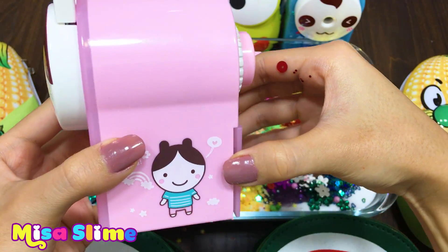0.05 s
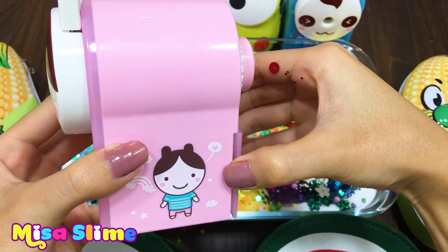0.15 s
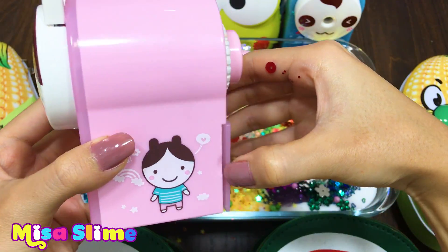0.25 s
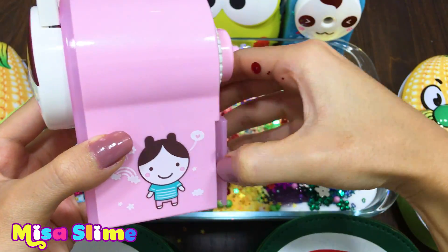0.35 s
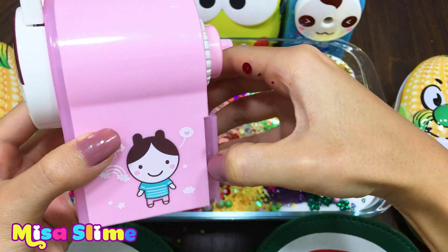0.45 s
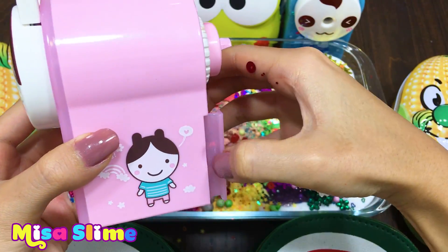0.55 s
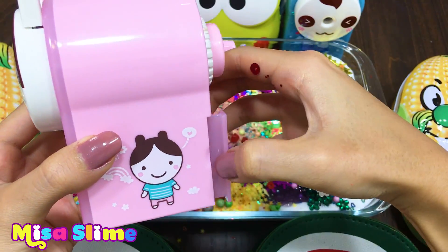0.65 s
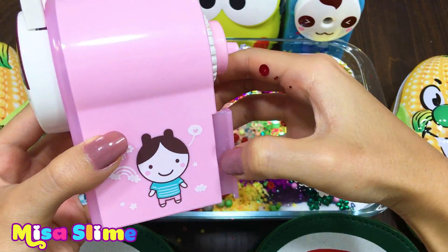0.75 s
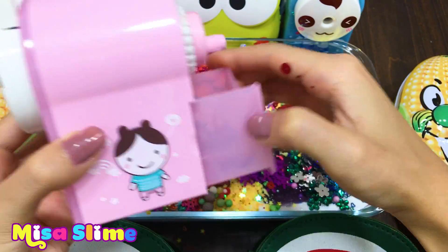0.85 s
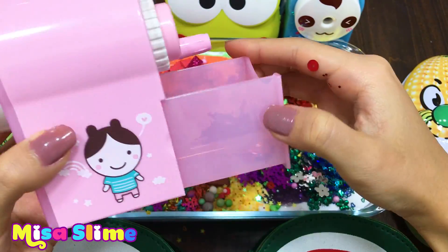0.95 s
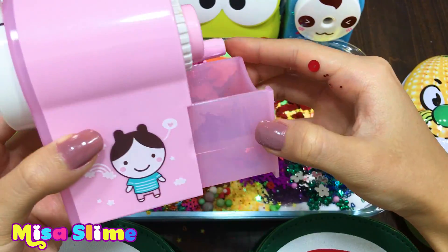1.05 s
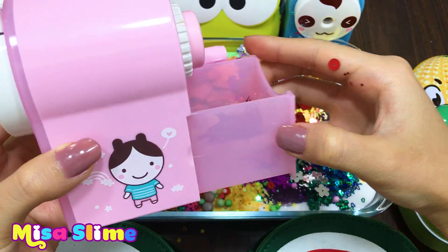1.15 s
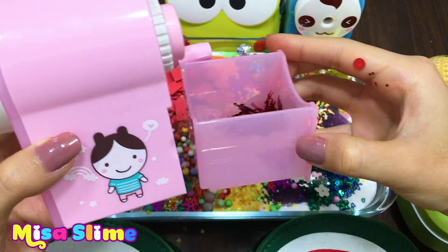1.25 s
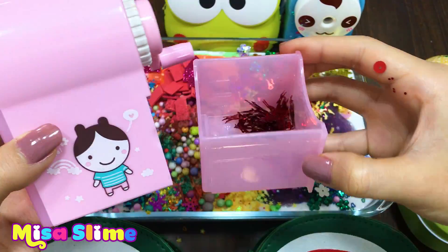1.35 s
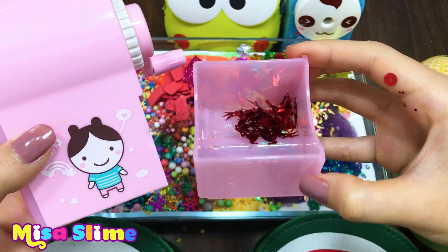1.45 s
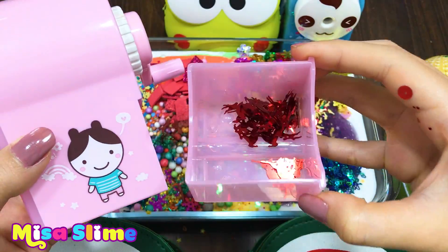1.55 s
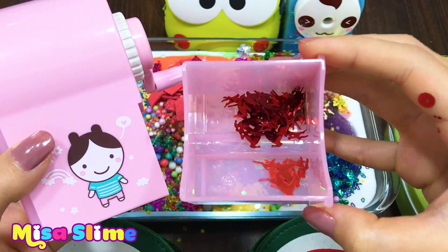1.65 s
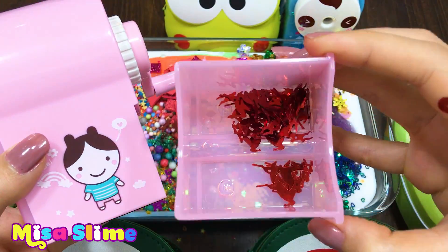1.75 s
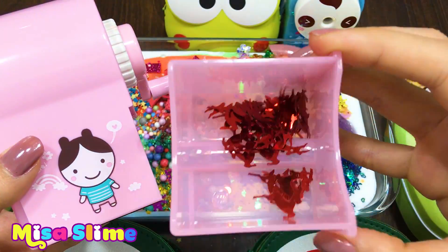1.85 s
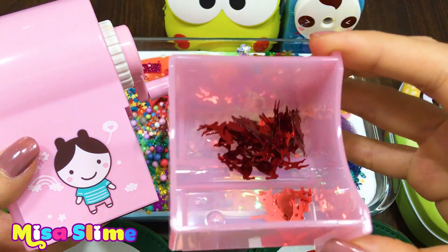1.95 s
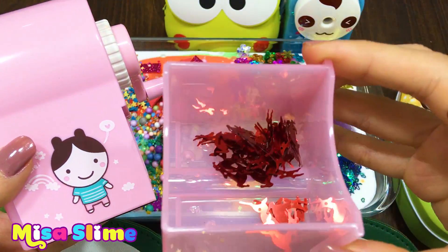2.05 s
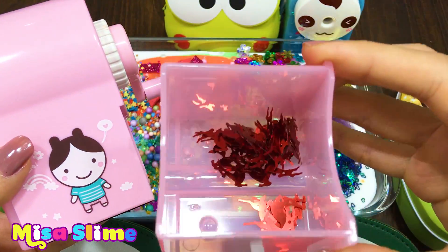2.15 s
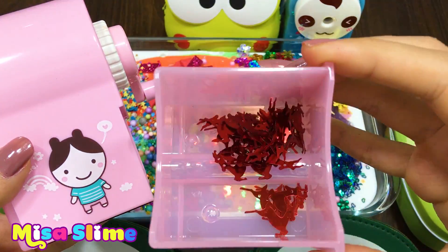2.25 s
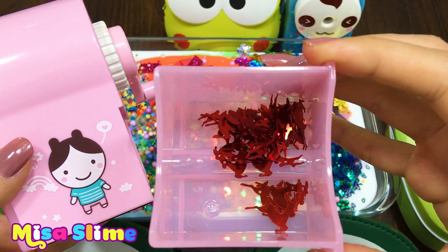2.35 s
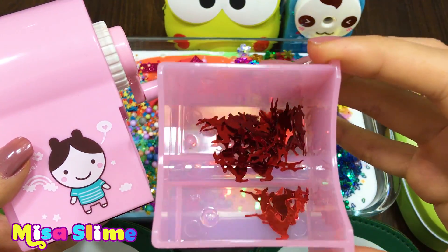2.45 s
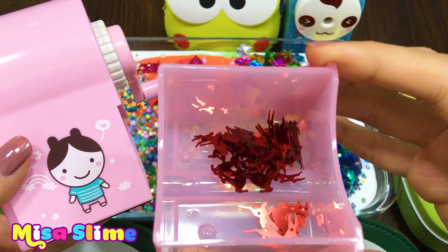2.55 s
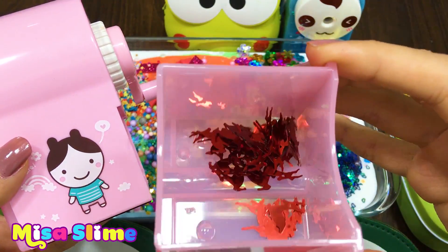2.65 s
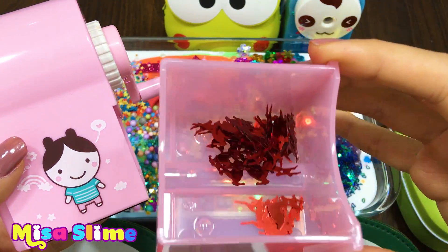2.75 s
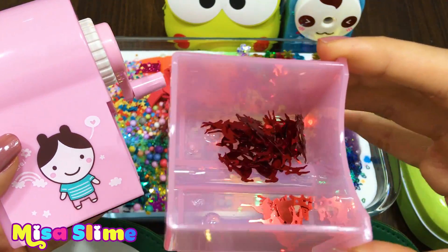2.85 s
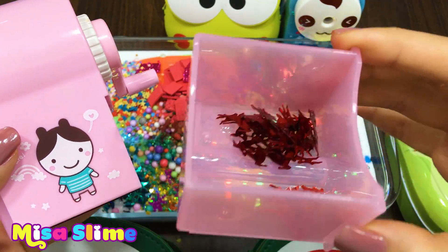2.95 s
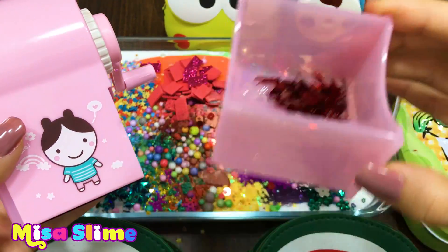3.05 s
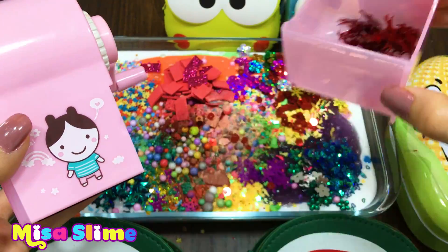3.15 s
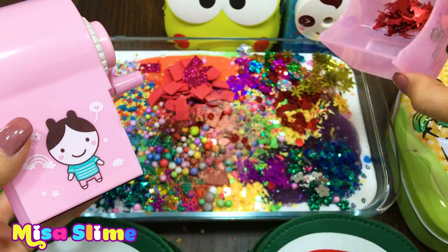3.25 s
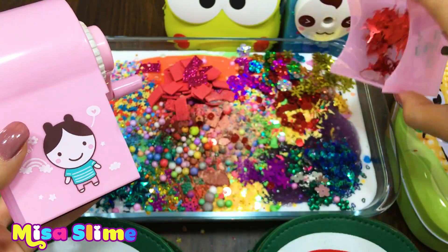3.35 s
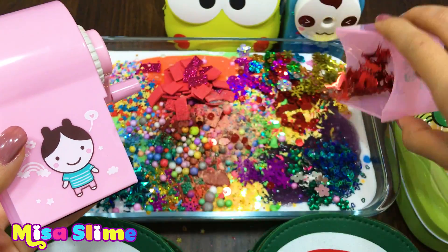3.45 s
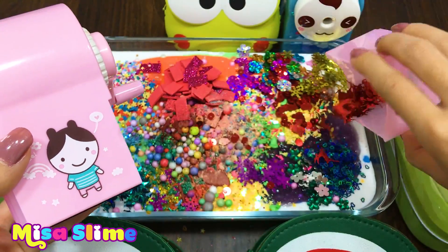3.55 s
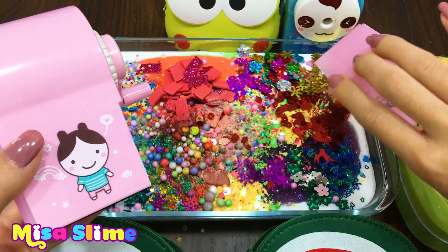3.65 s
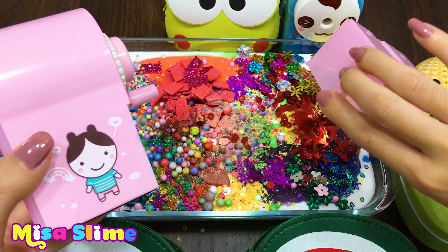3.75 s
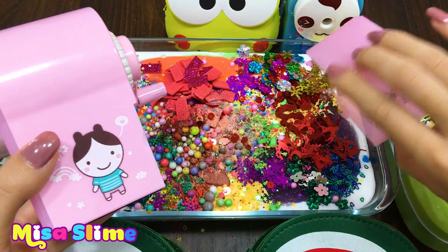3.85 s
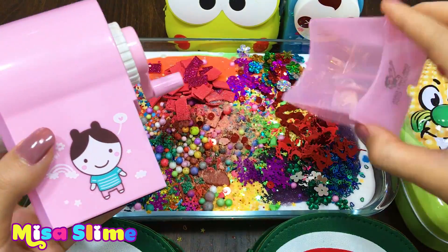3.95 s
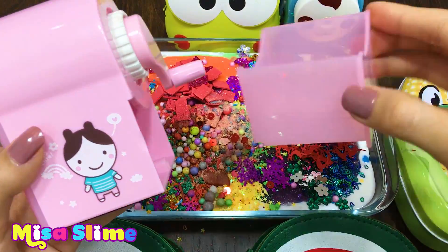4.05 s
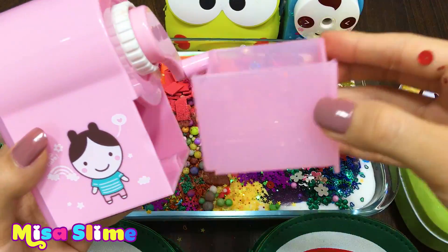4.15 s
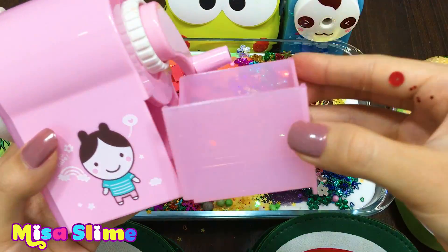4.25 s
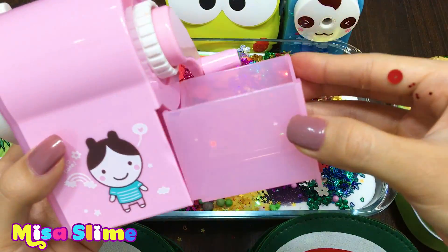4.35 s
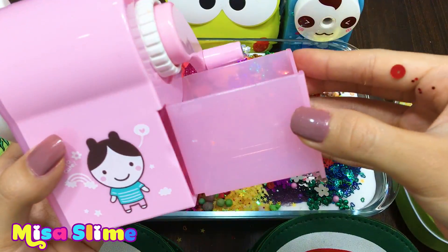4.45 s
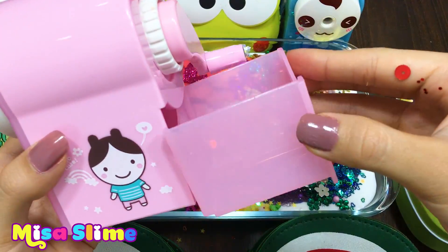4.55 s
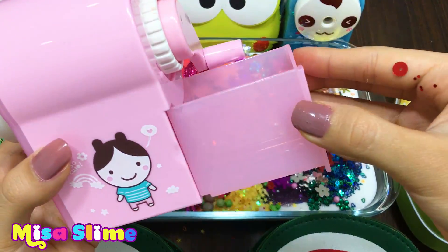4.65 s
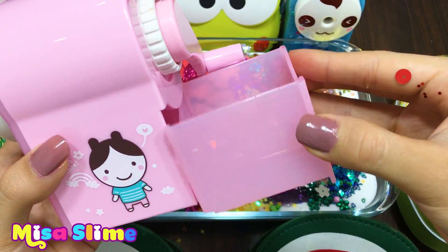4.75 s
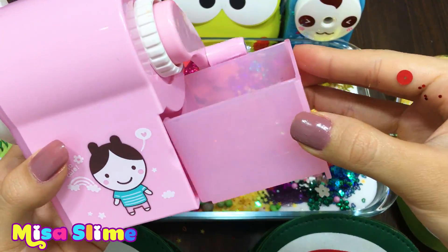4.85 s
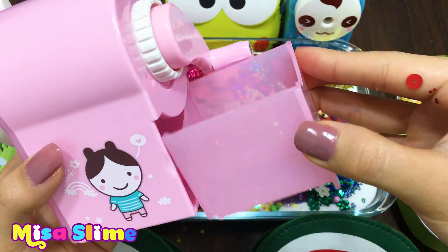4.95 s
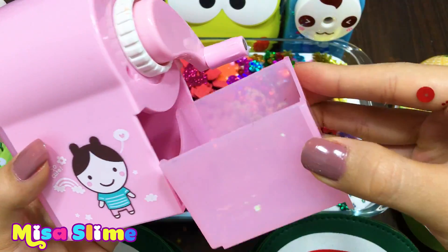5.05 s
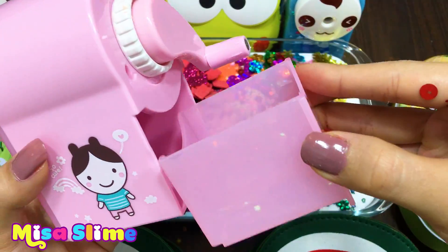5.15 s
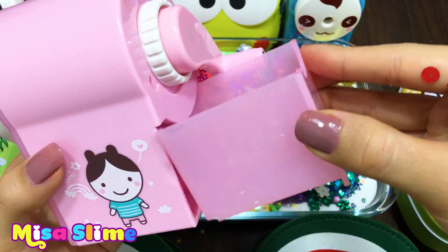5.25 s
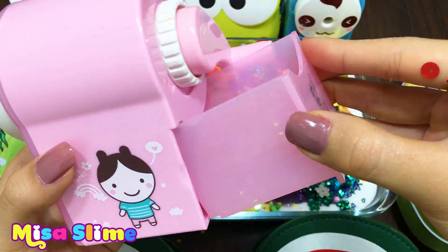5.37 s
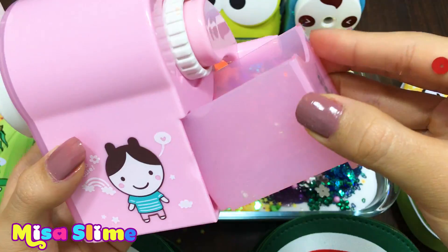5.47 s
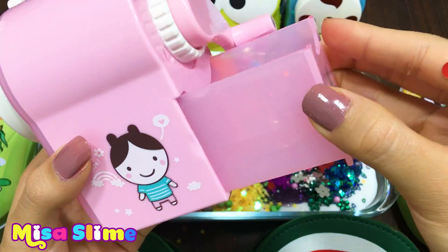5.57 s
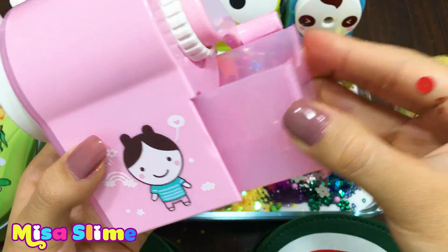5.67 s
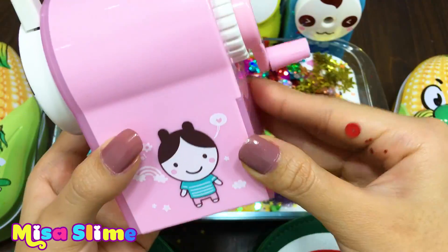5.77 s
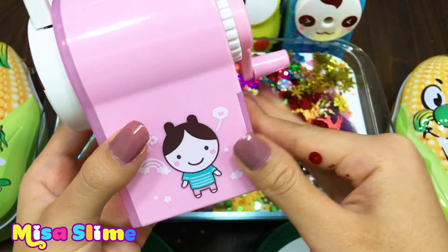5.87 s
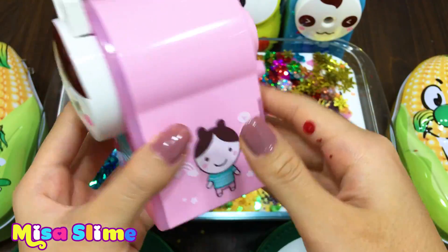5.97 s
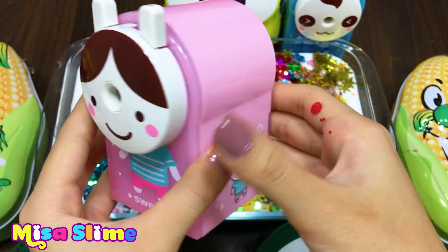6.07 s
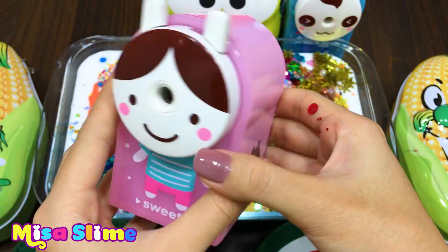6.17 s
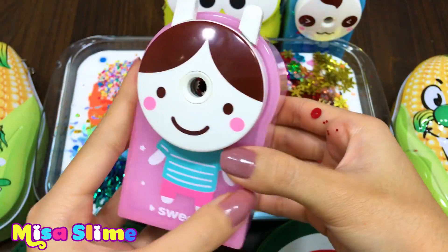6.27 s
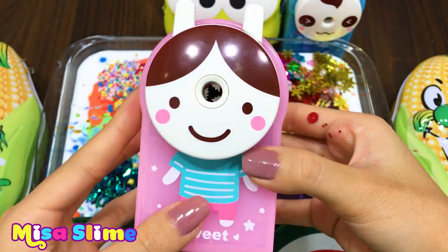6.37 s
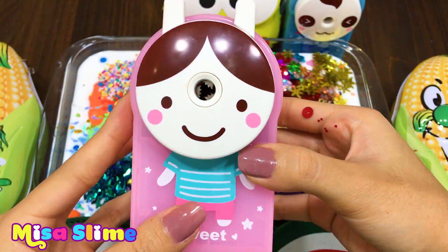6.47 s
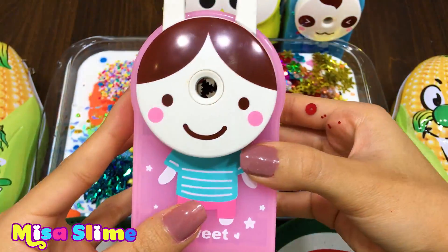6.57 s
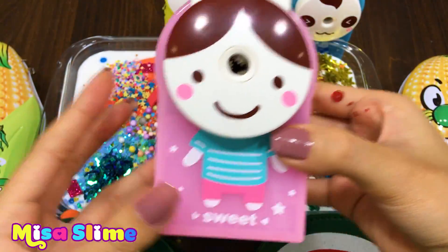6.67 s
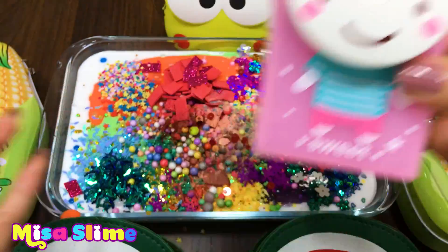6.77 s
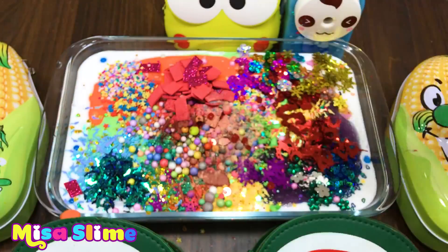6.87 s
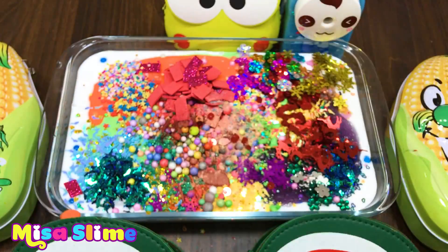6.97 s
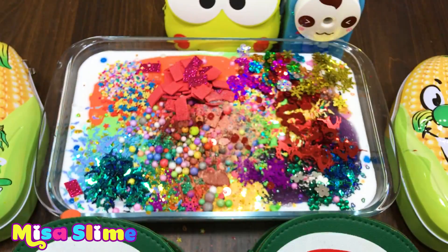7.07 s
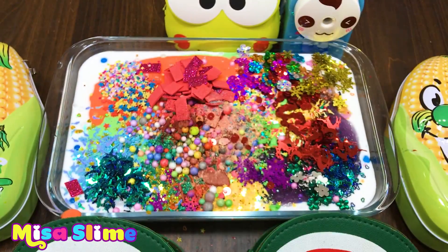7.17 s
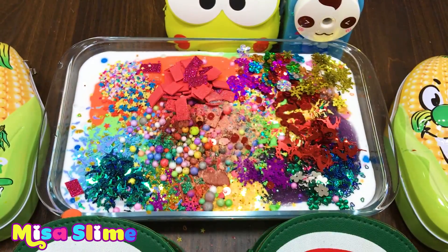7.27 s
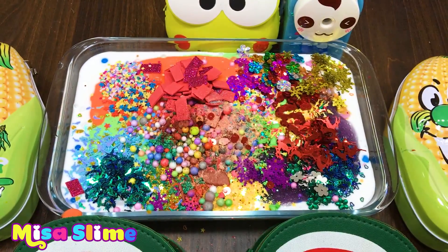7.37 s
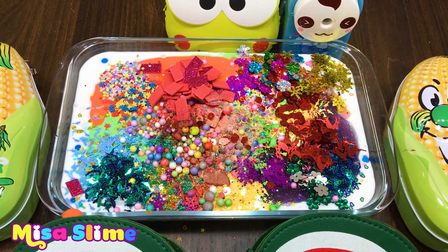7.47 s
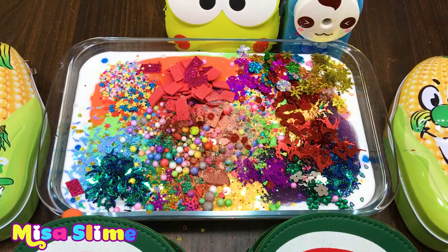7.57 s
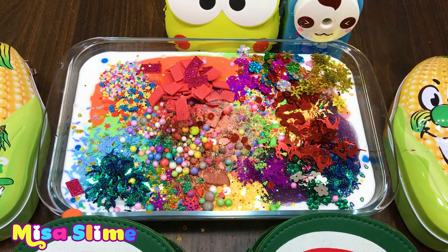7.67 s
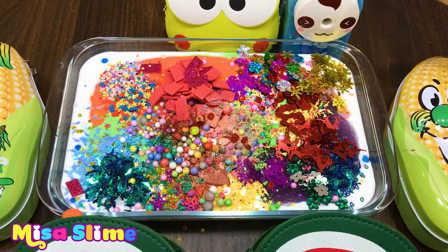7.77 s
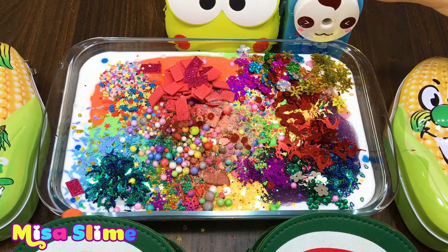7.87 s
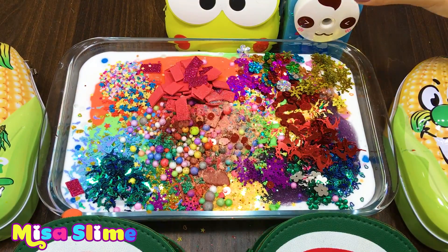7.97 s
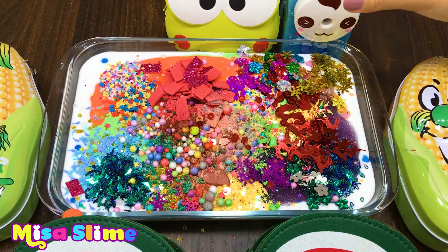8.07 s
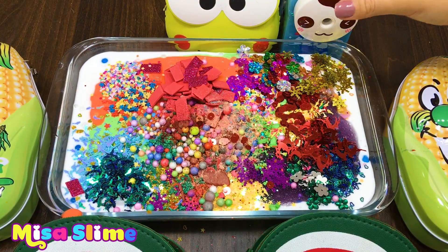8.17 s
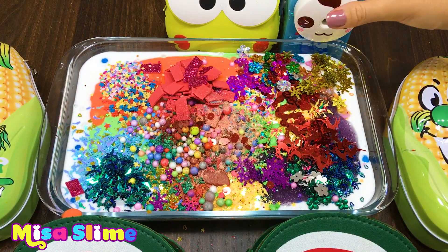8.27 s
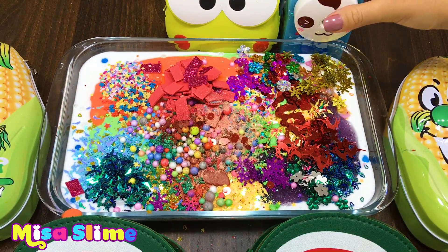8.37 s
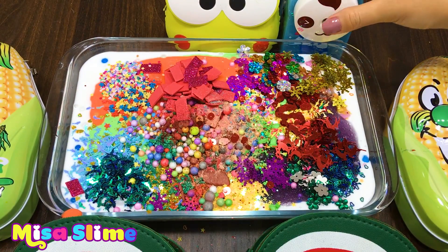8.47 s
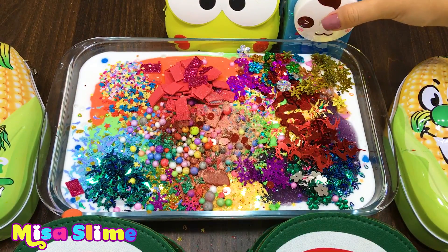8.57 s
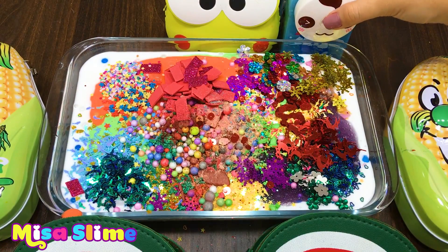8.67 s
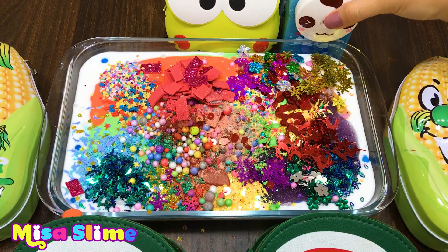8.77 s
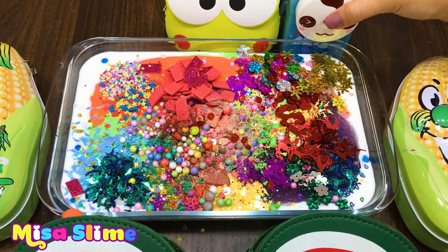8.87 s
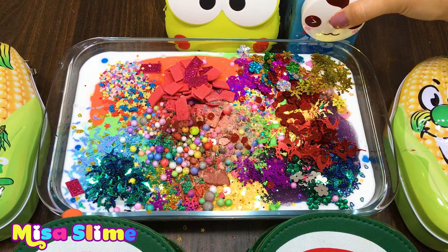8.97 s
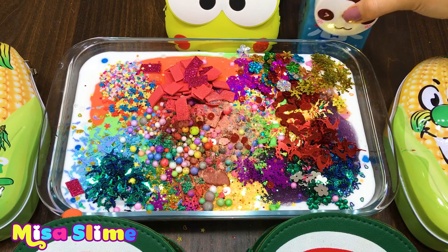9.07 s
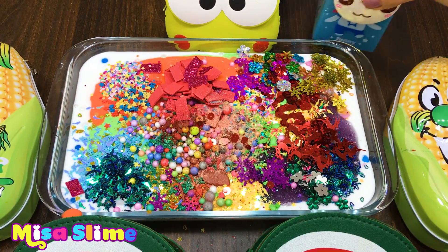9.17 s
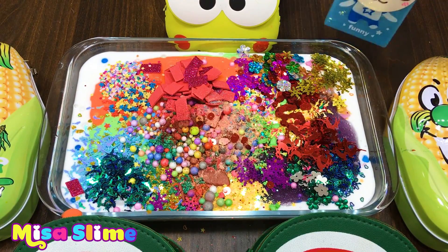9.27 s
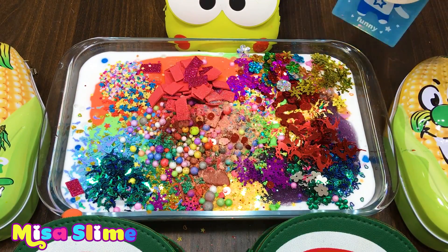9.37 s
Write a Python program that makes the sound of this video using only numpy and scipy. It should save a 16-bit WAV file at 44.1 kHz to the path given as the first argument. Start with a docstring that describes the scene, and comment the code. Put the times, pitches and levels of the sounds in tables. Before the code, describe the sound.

Hands handle a hollow plastic pencil sharpener close to the microphone in a quiet, bare room with a slight echo. Light clicks fill the first second. At 1.1 seconds its drawer comes out with two sharp clacks, a scrape and smaller knocks until 1.6. Sequins shift faintly inside around 2 seconds, then tip out in a bright, fine, rustling patter from 3.4 to 4.1, strongest near 3.7. From 4.5 to 5.7 the drawer knocks and scrapes against its slot in clattering, hollow clusters, then shuts at 6 seconds with a loud clack and a dull thud. Softer taps and rubs follow until about 7.5 as the sharpener is set aside. Between 7.9 and 8.5 a second one is dragged over a wooden table with light knocks and soft low thuds. A tiny tick near 9 seconds leaves only faint room tone.

```python
"""A quiet, bare room, close up. Hands pull the drawer out of a hollow plastic pencil sharpener, tip out
its sequins, knock it back into its slot and set the sharpener aside, then drag a second one off a wooden
table. Knocks ring the plastic walls and the drawer and boom in the empty slot; rubs are dense tiny slips
with a hiss on top. The sequins patter and rustle in the drawer, and the table top answers with soft thuds."""
import sys
import numpy as np
from scipy import signal
from scipy.fft import rfft, irfft
from scipy.io import wavfile
from scipy.ndimage import uniform_filter1d

SR = 44100
rng = np.random.default_rng(int(sys.argv[2]) if len(sys.argv) > 2 else 0)


def wrap_up_sound(samples):
    """Save the sound to the file named by the first command line argument, as 16-bit audio."""
    columns = np.atleast_2d(samples).T
    # keep every value between -1 and 1, then stretch to whole-number steps
    tamed = np.clip(columns, -1, 1)
    steps = np.round(tamed * 32767).astype(np.int16)
    wavfile.write(sys.argv[1], SR, steps)


N = 415422

# modes of the housing walls, the drawer and the empty slot: (pitch [Hz], width [Hz], level [dB])
HOUSING_MODES = [(1024, 110, -4), (1204, 150, -2.5), (1405, 110, -4), (1629, 150, -2), (2222, 260, -3),
                 (2637, 110, -9), (2980, 270, -4.5), (3904, 1000, -9), (4160, 85, -8), (4480, 270, -9),
                 (5460, 1400, -7), (6126, 190, -12.5), (6873, 990, -4)]
DRAWER_MODES = [(1920, 110, 1.5), (1973, 170, 2), (2034, 52, -4.5), (2816, 16, -10.5), (3478, 40, -12.5),
                (4727, 130, -14.5), (5083, 70, -8.5), (5400, 95, -22), (5590, 22, -13.5), (5760, 210, -21),
                (6900, 40, -13.5), (7570, 37, -18.5), (8220, 56, -15.5), (8450, 160, -25),
                (8900, 110, -17.5), (10608, 110, -22.5), (11400, 290, -16.5), (13000, 400, -23),
                (14700, 430, -28)]
SLOT_MODES = [(625, 88, -8), (718.2, 40, 0.5), (808, 44, 1.5)]
DRAWER_OUT_S = (1.1, 6.0)  # the drawer is out of its seat between these times


def gain_of(db):
    """Decibels to a gain."""
    return 10 ** (np.asarray(db) / 20)


def unit_rms(x):
    """Normalises to rms 1."""
    return x / np.sqrt(np.mean(x ** 2) + 1e-20)


def unit_peak(x):
    """Normalises to peak 1."""
    return x / (abs(x).max() + 1e-20)


def unit_mode(ring):
    """Scales a ring so that its strongest mode starts near size 1."""
    onset = ring[:512] * np.hanning(1024)[512:]
    return ring * 128 / abs(rfft(onset)).max()


def curve_at(points, hz):
    """Reads a curve on a log frequency axis."""
    f, value = np.transpose(points)
    return np.interp(np.log(hz + 1), np.log(f + 1), value)


def add(mix, s, sound):
    """Drops a sound into the mix at s seconds."""
    part = mix[round(s * SR):][:len(sound)]
    part += sound[:len(part)]


def colour(x, spectrum):
    """Minimum-phase EQ of energy 1 with the given spectrum."""
    log_gain = curve_at(spectrum, abs(np.fft.fftfreq(4096, 1 / SR))) * np.log(10) / 20
    taps = np.fft.ifft(np.exp(np.conj(signal.hilbert(log_gain)))).real[:1024]
    return signal.oaconvolve(x, taps / np.linalg.norm(taps))[:len(x)]


def radiated(x, low_hz):
    """Steep low cut: a small object sends out no bass."""
    return signal.sosfilt(signal.butter(6, low_hz, "high", fs=SR, output="sos"), x)


def ringing(modes, spot_hz=2000, focus_db=0, spread_db=0):
    """Modal ring of energy 1; modes lose focus_db per octave away from the struck spot's pitch."""
    hz, width, db = np.transpose(modes)[:, :, None]
    t = np.arange(4096) / SR
    luck = rng.standard_normal((len(modes), 1))
    mode_db = db - focus_db * abs(np.log2(hz / spot_hz)) + spread_db * abs(luck)
    size = np.sign(luck) * gain_of(mode_db) * np.sqrt(width)
    ring = (size * np.exp(-np.pi * width * t) * np.sin(2 * np.pi * hz * t)).sum(0)
    return ring / np.linalg.norm(ring)


def contact(ms):
    """A short rattle of force that swells and fades, about equally strong at all pitches."""
    age = np.arange(2048) / SR / (ms / 1000)
    envelope = age * np.exp(-2 * age)
    rattle = rfft(rng.standard_normal(len(age)) * envelope)
    return irfft(rattle / (abs(rattle) + 1e-9)) * np.sqrt(envelope)


def grit(per_s, spread_db):
    """Random train of small contacts, a few of them large."""
    size = gain_of(spread_db * np.minimum(rng.exponential(1, N), 4)) * rng.standard_normal(N)
    return unit_rms(size * (rng.random(N) < per_s / SR))


def swells(moves, top, ends_db):
    """Envelope of movements: each peaks at the share `top` of its length and dies away again."""
    t, out = np.arange(N) / SR, np.zeros(N)
    for start, end, db in moves:
        shape_db = np.interp(t, [start, start + top * (end - start), end], [ends_db, 0, ends_db])
        out += gain_of(db + shape_db) * (t > start) * (t < end)
    return out


def room_tone():
    """A faint bed of noise whose bass drifts slowly."""
    # spectrum of the still room: (frequency [Hz], relative level [dB])
    spectrum = [(15, -51), (25, -21), (70, -0.5), (181, -14), (219, -11.5), (258, -12), (420, -17),
                (685, -22.5), (1030, -23.5), (1460, -27), (2380, -28), (15100, -34), (16400, -44.5)]
    frames, hz = N // 256 + 5, np.fft.rfftfreq(1024, 1 / SR)
    real, imag, drift = rng.standard_normal((frames, 513, 3)).T
    drift = unit_rms(uniform_filter1d(uniform_filter1d(drift, 6, 0), 24, 1))
    drift_db = 2.0 * drift / (1 + hz[:, None] / 400)
    spectra = (real + 1j * imag) * gain_of(curve_at(spectrum, hz)[:, None] + drift_db)
    return gain_of(-65) * unit_rms(signal.istft(spectra, nperseg=1024, noverlap=768)[1][:N])


def room_reverb(x):
    """Dense echoes, each band dying at its own speed; three tails crossfade to suggest moving hands."""
    # decay of the bare room: (frequency [Hz], t60 [s])
    decay = [(150, 0.59), (400, 0.93), (1040, 0.69), (2760, 0.73), (7280, 0.48), (11000, 0.55),
             (15000, 0.61)]
    hz, t, spectra = signal.stft(rng.standard_normal((3, SR)), SR, nperseg=256)
    fade = gain_of(-60 * t / curve_at(decay, hz)[:, None])
    tails = signal.istft(spectra * fade, SR, nperseg=256)[1][:, :SR]
    tails *= np.clip((np.arange(SR) / SR - .003) / 0.004, 0, 1)  # the first walls answer after 3 ms
    turn = np.pi * 4.0 * np.arange(N) / SR + np.pi / 3 * np.arange(3)[:, None]
    sends = np.sqrt(2 / 3) * np.cos(turn)
    return signal.fftconvolve(x * sends, tails / np.linalg.norm(tails[0]), axes=1)[:, :N].sum(0)


def table_thuds():
    """Low, damped swings of the table top, each with an uneven decay."""
    # soft blows into the wood: (time [s], level [dB], pitch [Hz], t60 [s])
    blows = [(1.518, -40.5, 104, 0.16), (1.591, -47, 104, 0.28), (6.02, -13.5, 253, 0.034),
             (7.916, -46.5, 209, 0.26), (8.06, -47.5, 271, 0.1), (8.164, -35.5, 139.7, 0.29),
             (8.277, -42, 151, 0.15), (8.335, -39.5, 143.4, 0.17), (8.449, -54.5, 144, 0.44),
             (6.34, -44.5, 293, 0.083)]
    out, t = np.zeros(N), np.arange(SR // 2) / SR
    attack = 1 - np.exp(-t / .004)
    for s, db, hz, t60 in blows:
        waver = 1 + 0.68 * unit_rms(uniform_filter1d(rng.standard_normal(len(t)), size=600))
        add(out, s, waver * gain_of(db - 60 * t / t60) * np.sin(2 * np.pi * hz * t) * attack)
    return out


def rubs():
    """Dense slips excite the housing, plus drawer and slot while the drawer is out; hiss rides on top."""
    # plastic and fingers rubbing along the housing: (start [s], end [s], level [dB], relative hiss [dB])
    strokes = [(0.44, 0.588, -65, -16), (0.61, 0.71, -71.5, 14.5), (1.082, 1.29, -43, -7.5),
               (1.343, 1.572, -46, -11), (4.56, 4.864, -46, -12), (4.95, 5.346, -40.5, -10),
               (5.522, 5.67, -44.5, -5), (5.874, 5.934, -49.5, -2), (5.926, 6.078, -38.5, -16),
               (6.03, 6.245, -54, 0), (6.207, 6.38, -51.5, 1.5), (6.622, 6.683, -58, -0.5),
               (7.088, 7.181, -61.5, -6), (7.178, 7.243, -64.5, 2), (7.235, 7.426, -56, -4.5),
               (7.4, 7.533, -53, -4), (7.879, 8.12, -48, -19), (8.057, 8.453, -52, -17)]
    # hiss of a rub: (frequency [Hz], level [dB])
    hiss_spectrum = [(1500, -25), (4000, -4), (7000, 0.5), (11000, -3), (16000, -6.5)]
    grain = grit(per_s=5000, spread_db=1.5)
    shape = dict(top=0.23, ends_db=-16.5)
    slips = grain * swells([row[:3] for row in strokes], **shape)
    hiss = grain * swells([(start, end, db + hiss_db) for start, end, db, hiss_db in strokes], **shape)
    t = np.arange(N) / SR
    drawer_out = (t > DRAWER_OUT_S[0]) & (t < DRAWER_OUT_S[1])
    scrape = signal.oaconvolve(slips, ringing(HOUSING_MODES, 1000, focus_db=1.7))[:N]
    open_ring = 0.34 * ringing(DRAWER_MODES) + 0.11 * ringing(SLOT_MODES)
    scrape += signal.oaconvolve(slips * drawer_out, open_ring)[:N]
    return radiated(scrape + colour(hiss, hiss_spectrum), low_hz=780)


def sequins():
    """Light flakes patter on the drawer walls, favouring the high modes, and rustle on each other."""
    # sequins sliding in the drawer: (start [s], end [s], level [dB])
    slides = [(1.92, 2.02, -70.5), (2.05, 2.2, -65), (2.98, 3.13, -67.5), (3.4, 3.6, -59.5),
              (3.565, 3.7, -39.5), (3.66, 3.8, -40), (3.72, 3.93, -46), (3.9, 4.16, -57),
              (4.2, 4.34, -68.5)]
    # clumps landing on the drawer wall: (time [s], peak [dB], spot pitch [Hz], relative sparkle [dB])
    clumps = [(1.951, -53, 2850, -28), (2.104, -54, 8100, 5), (3.414, -51, 8120, -17),
              (3.4306, -47, 5050, -20.5), (3.4444, -49.5, 2840, -20), (3.4684, -59, 2820, 4),
              (3.576, -34, 8400, -1), (3.5957, -34, 5460, 2), (3.6105, -37, 5640, 11),
              (3.6215, -33, 5700, 5), (3.6341, -31, 1840, 3), (3.6504, -35, 5240, -3),
              (3.6682, -34, 5300, 5), (3.6877, -29, 5350, 3), (3.6964, -28, 5200, 2),
              (3.708, -44, 5680, 17), (3.7234, -27.5, 5070, 2), (3.7508, -22.5, 9100, -10),
              (3.8074, -43, 4960, 6), (3.8174, -50, 1940, 5), (3.929, -40, 5310, 9),
              (4.0034, -45, 8050, 0.5), (4.0198, -42.5, 4800, -21)]
    # flakes rustling, and flakes snapping together: (frequency [Hz], level [dB])
    rustle_spectrum = [(1000, -36.5), (2500, -22), (5000, -1), (8500, 2.5), (11000, -18), (16000, -16.5)]
    sparkle_spectrum = [(5000, -42.5), (9000, -3), (11000, 1), (13000, 3), (16000, -5)]
    flow, patter = swells(slides, top=0.32, ends_db=-20), np.zeros(N)
    for _ in range(3):
        hits = flow * grit(per_s=1800, spread_db=3.3)
        patter += signal.oaconvolve(hits, ringing(DRAWER_MODES, 11000, focus_db=5.3, spread_db=2.2))[:N]
    rustle = colour(flow * grit(per_s=6000, spread_db=3.0), rustle_spectrum)
    out = gain_of(-4.5) * patter + gain_of(-7) * rustle
    for s, db, spot_hz, sparkle_db in clumps:
        force = contact(ms=2.3)
        ring = ringing(DRAWER_MODES, spot_hz, focus_db=24.0, spread_db=6.9)
        add(out, s, gain_of(db) * unit_peak(signal.fftconvolve(force, ring)))
        add(out, s, gain_of(db + sparkle_db) * unit_peak(colour(force, sparkle_spectrum)))
    return radiated(out, low_hz=1600)


def knocks():
    """Each contact shakes walls, edges and drawer; its weight shoves the body or booms in the slot."""
    # plastic on plastic; weight, drawer and edges are relative to the walls:
    # (time [s], walls [dB], weight [dB], drawer [dB], edges [dB], spot pitch [Hz])
    hits = [(0.0815, -23, -22, -29, -11, 1410), (0.171, -52.5, -4.5, -16, -26, 977),
            (0.2588, -46.5, -17, -40, -27, 4660), (0.3368, -45, -10.5, -11, -27, 1850),
            (.392, -49.5, -5.5, -36, -19, 1340), (0.454, -49, -6, -32, -21, 1320),
            (0.5056, -30.5, -4.5, -20, -34, 1300), (0.5851, -29.5, -17.5, -26, -39, 2610),
            (0.6161, -36.5, -11.5, -18.5, -8, 1867), (0.6231, -26, -13, -16.5, -8, 2700),
            (0.6616, -46, -12.5, -14.5, -4, 2189), (0.752, -39.5, -24, -21, -40, 1297),
            (0.827, -27.5, -6, -28, -26.5, 1270), (0.8413, -37, -11, -17.5, -18, 1211),
            (1.097, -42, -7, -10, -15, 1302), (1.1193, -5.5, -22, -19, -22.5, 1466),
            (1.1507, -5, -18.5, -19.5, -26, 1590), (1.1664, -21, -17, -13, -27, 1930),
            (1.1977, -17, -19, -18.5, -39, 2180), (1.2292, -28, -9, 0.5, -33, 1980),
            (1.3798, -32.5, -23.5, 2, -3, 2170), (1.3884, -34, -28, -15, -7.5, 2100),
            (1.404, -26, -33, -6.5, -29, 2090), (1.4649, -15, -41.5, -11, -14.5, 2070),
            (1.4704, -21.5, -21, -4.5, -19, 1280), (4.5566, -11, -19.5, -7, -23, 1778),
            (4.61, -33, -8.5, -11.5, -6, 1920), (4.671, -26.5, -21, 5.5, -8, 1962),
            (4.682, -17.5, -13, -10.5, -27.5, 1770), (4.6974, -22.5, -17.5, -15.5, -16.5, 1960),
            (4.792, -13.5, -29, -4.5, -35, 1507), (4.798, -5.5, -23, -19, -21, 1678),
            (4.9197, -10.5, -29, -7, -22.5, 2020), (4.9353, -13.5, -15.5, -5.5, -28, 2070),
            (4.9608, -19, -15, -4.5, -25, 1976), (4.9892, -28.5, -13.5, -16, -20, 1430),
            (5.0265, -25, -16.5, -13, -28, 1160), (5.0412, -13.5, -18, -4.5, -32, 1990),
            (5.0469, -25, -21, -3, -15.5, 1965), (5.1188, -20.5, -8, -16, -17.5, 1223),
            (5.1224, -13.5, -17, -24.5, -6, 1525), (5.1326, -22, -22.5, -2.5, -17.5, 2060),
            (5.1496, -27, -12.5, -14.5, -25, 1418), (5.19, -22, -17.5, -17, -41.5, 1190),
            (5.499, -18.5, -25, 4, -10.5, 1149), (5.5541, -19.5, -29.5, -6.5, -16.5, 2089),
            (5.5588, -21, -21.5, 4, -23, 1958), (5.5799, -10.5, -29, -3, -27, 1920),
            (5.6018, -24.5, -25, -9, -30, 2030), (5.6264, -14, -15, -19.5, -20, 1910),
            (5.7725, -30, -13, -20.5, -35.5, 1965), (5.8529, -30.5, -21.5, -23, -28.5, 1200),
            (5.8992, -41.5, -15, -2.5, -18.5, 1868), (5.9422, -27, -26.5, -10.5, -21.5, 2060),
            (5.9508, -29, -15, -5, -25.5, 2000), (5.9686, -17.5, -22.5, -3, -30, 1950),
            (5.9935, -2, -28, -17, 0.5, 1610), (6.0059, -10, -23, -11.5, -18.5, 2237),
            (6.0206, -9.5, -19, -20, -20.5, 1250), (6.3228, -32.5, -6, -13, -26, 1220),
            (6.345, -34, -24, -29, -3, 1590), (6.3479, -32.5, -24, -19, -13, 1490),
            (6.4686, -41.5, -37, 0.5, -5, 2100), (6.517, -32.5, -13.5, -36, -21, 1460),
            (6.5334, -26.5, -21, -49, -32, 6200), (6.6809, -48, -22, -17, 0.5, 1053),
            (6.932, -50.5, -11.5, -15, -24, 1100), (6.9485, -50.5, -22, -19, -23, 2190),
            (6.992, -50, -24, -12, 0, 1350), (7.007, -49.5, -32, -9.5, 2, 1340),
            (7.017, -43, -35, -31, -11, 2100), (7.2592, -35, -34, -18, -5, 1530),
            (7.2998, -37, -14, -30, -24, 1280), (7.4125, -35, -15, -6, -2, 1980),
            (7.887, -26, -15, -24, -13.5, 1060), (7.9129, -34.5, -15, -26, -20, 3250),
            (7.9435, -19.5, -31, -46, -23, 1050), (8.0625, -31.5, -5, -19, -15, 980),
            (8.0708, -36.5, -6, -24, -2.5, 1070), (8.1485, -25, -12.5, -28.5, -6.5, 1070),
            (8.274, -40, 2.5, -22, 2.5, 1110), (8.4106, -45.5, -1, -17, -27, 1724),
            (8.956, -49.5, -25, -17, -22.5, 1550)]
    # click of the thin edges: (frequency [Hz], level [dB])
    edge_spectrum = [(3000, -47.5), (6000, -11), (8000, 1), (10500, 6.5), (12500, -2.5), (14000, -8),
                     (16000, -8)]
    # modes of the whole body when shoved: (pitch [Hz], width [Hz], level [dB])
    body_modes = [(260, 280, 3.5), (363, 63, -0.5), (463, 120, -5)]
    # the slot's boom rises as the drawer comes out: (time [s], pitch [ratio])
    slot_tuning = [(.6, 0.65), (.83, 0.83), (1.12, 0.99), (5.9, 1.0), (6.0, .8)]
    # response with the drawer ajar, out and shut: (body shove [dB], slot boom [dB], contact time [ms])
    drawer_states = [(-3.5, -4, 1.8), (-18, 1.5, 2.8), (1, -15.5, 2.2)]
    clack, weight = np.zeros(N), np.zeros(N)
    for s, walls_db, weight_db, drawer_db, edge_db, spot_hz in hits:
        shove_db, boom_db, contact_ms = drawer_states[np.searchsorted(DRAWER_OUT_S, s)]
        force, tap = contact(contact_ms), contact(ms=2.1)
        dull_db = 2 - 0.1 * edge_db  # a softer hit on the edges leaves the drawer duller
        drawer_ring = unit_mode(ringing(DRAWER_MODES, 1900, focus_db=dull_db, spread_db=1.8))
        drawer = signal.fftconvolve(tap / np.linalg.norm(tap), drawer_ring)
        walls = signal.fftconvolve(force, ringing(HOUSING_MODES, spot_hz, focus_db=3.8, spread_db=2.8))
        add(clack, s, gain_of(walls_db) * unit_peak(walls))
        add(clack, s, gain_of(walls_db + edge_db) * unit_peak(colour(force, edge_spectrum)))
        add(clack, s, gain_of(walls_db + drawer_db) * drawer)
        slot_ratio = np.interp(s, *np.transpose(slot_tuning))
        boom = unit_mode(ringing(np.multiply(SLOT_MODES, [slot_ratio, 1, 1]), spread_db=0.5))
        shove = unit_peak(ringing(body_modes, spread_db=5.0))
        add(weight, s, gain_of(walls_db + weight_db + boom_db) * boom)
        add(weight, s, gain_of(walls_db + weight_db + shove_db) * shove)
    return radiated(clack, low_hz=610) + radiated(weight, low_hz=190)


def scene():
    """The close sounds, their reverb and the room tone, in mono."""
    close = knocks() + sequins() + rubs() + table_thuds()
    return (close + gain_of(-8.5) * room_reverb(close) + room_tone())[None]


def record(dry):
    """The microphone drops the lowest bass, clips at full scale and cuts the very top."""
    low_cut = signal.sosfilt(signal.butter(3, 50, "high", fs=SR, output="sos"), dry)
    high_cut_taps = signal.firwin(511, 16050, window=("kaiser", 9), fs=SR)
    return signal.oaconvolve(np.clip(low_cut, -1, 1), high_cut_taps[None], "same")


dry = scene()
out = record(dry)
wrap_up_sound(out)
```